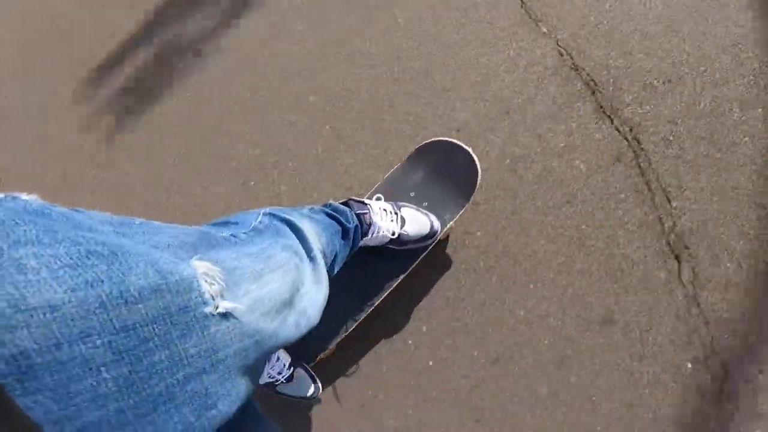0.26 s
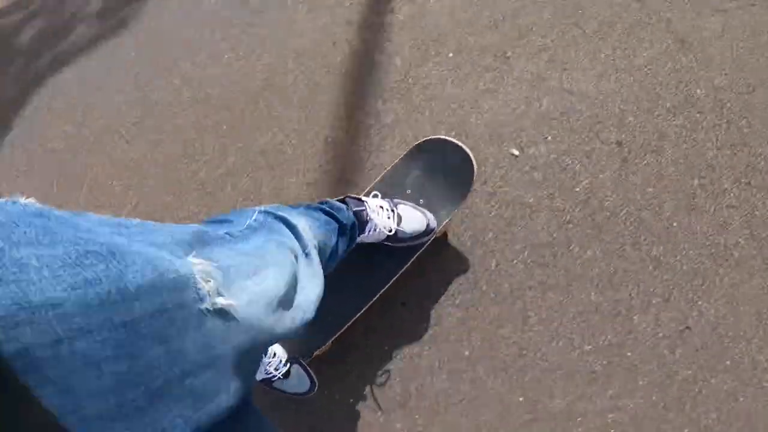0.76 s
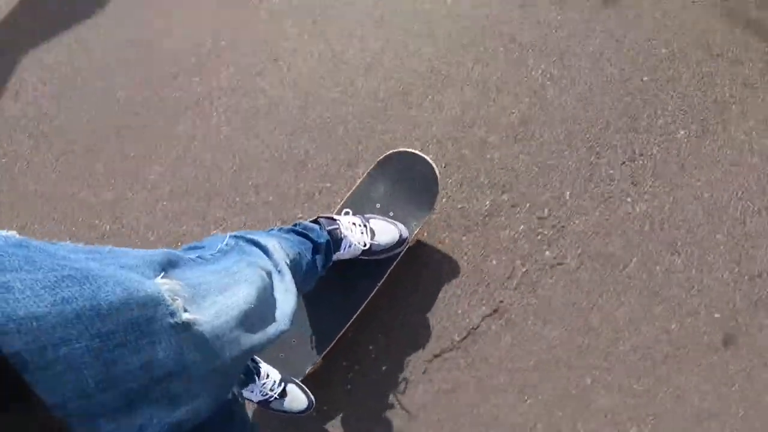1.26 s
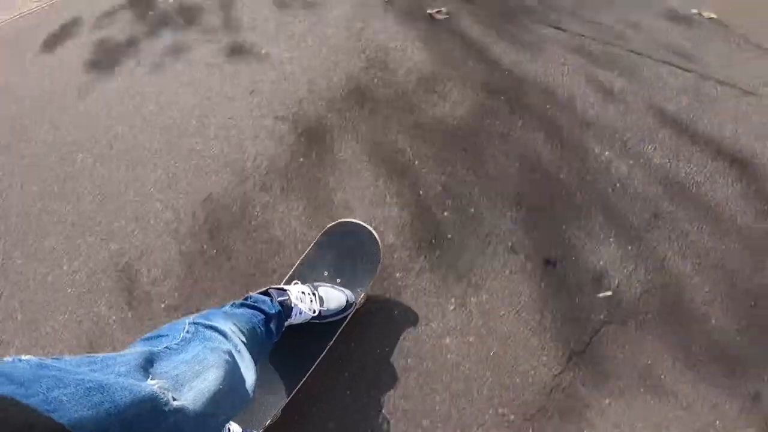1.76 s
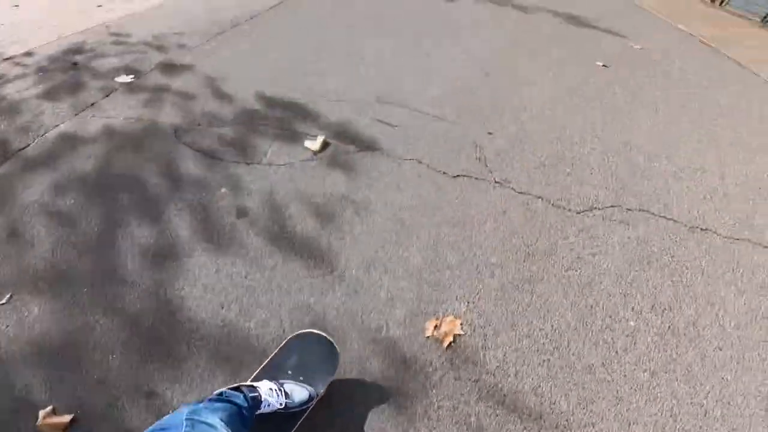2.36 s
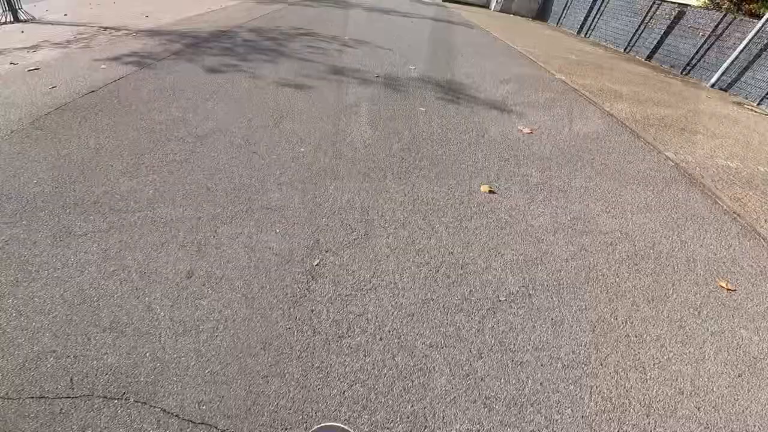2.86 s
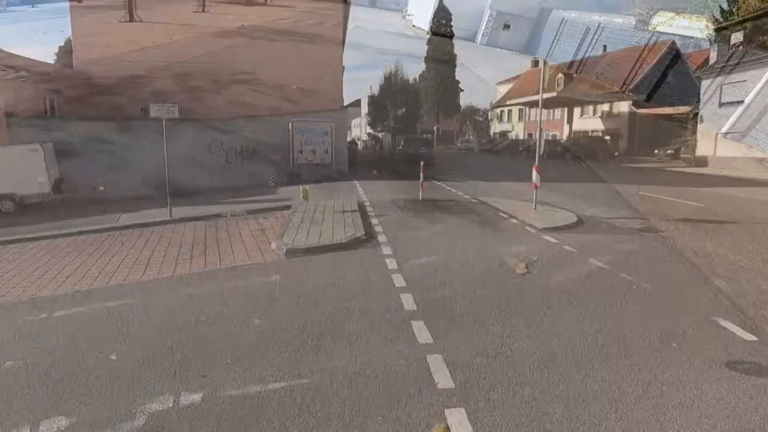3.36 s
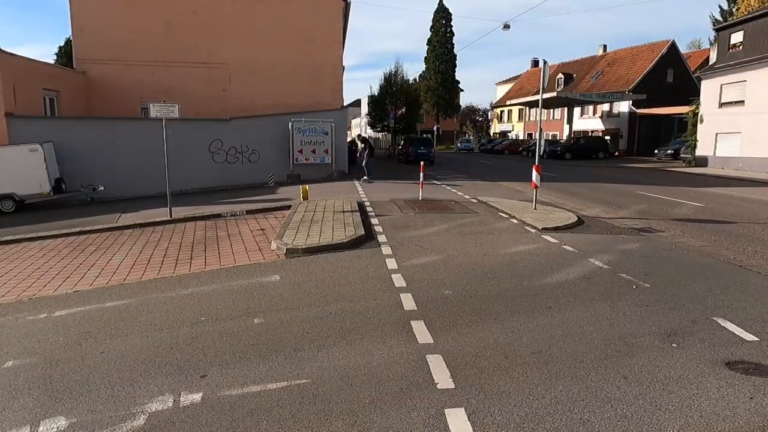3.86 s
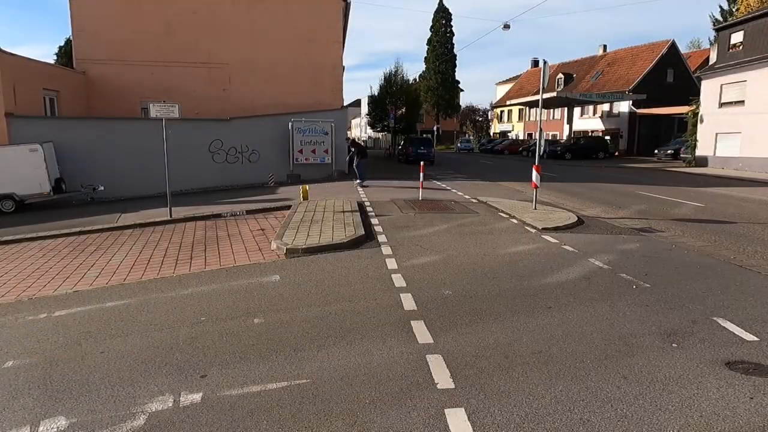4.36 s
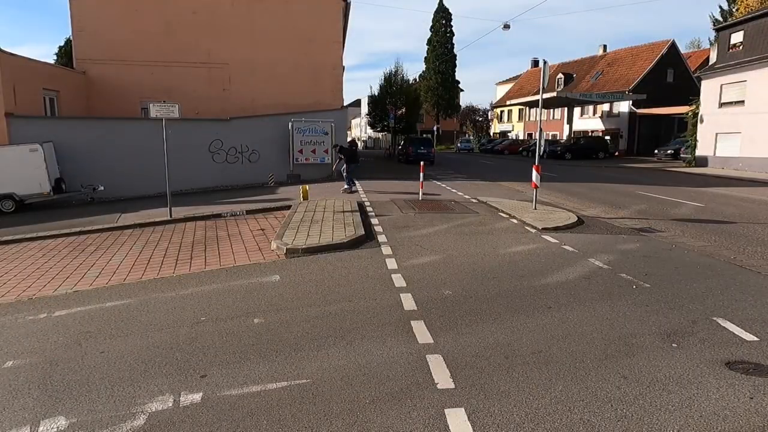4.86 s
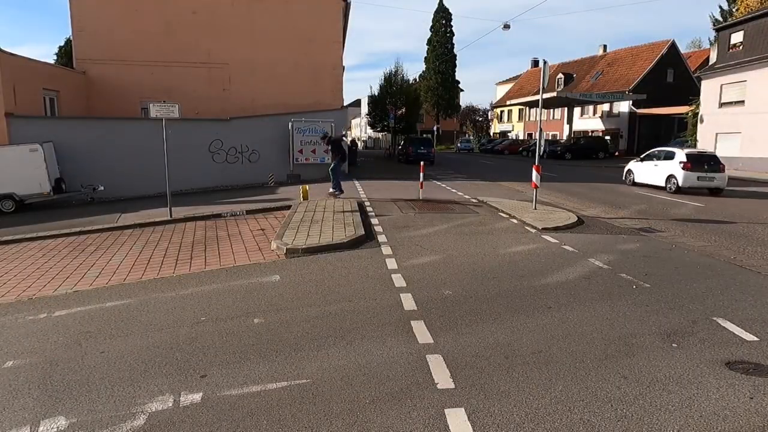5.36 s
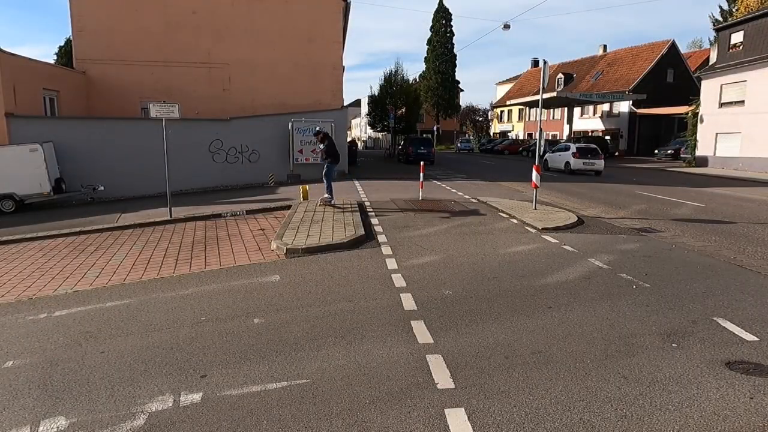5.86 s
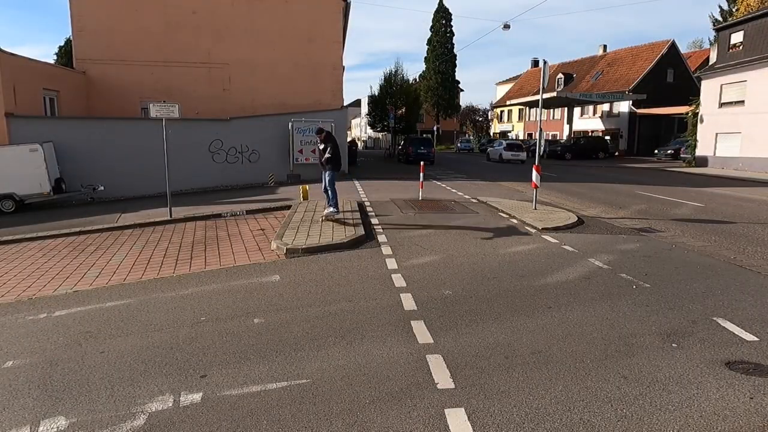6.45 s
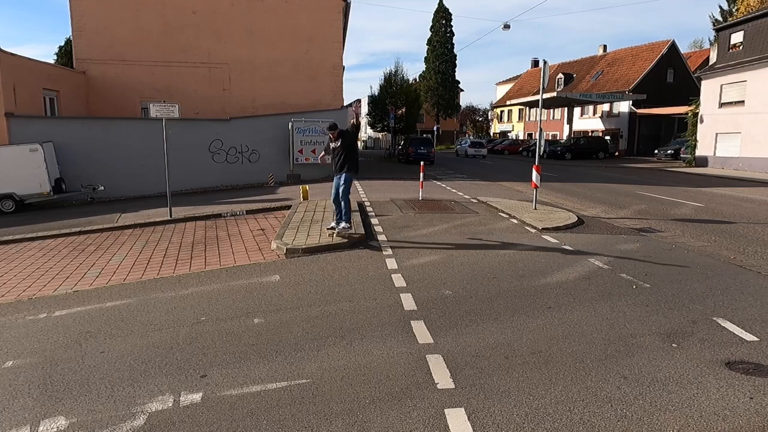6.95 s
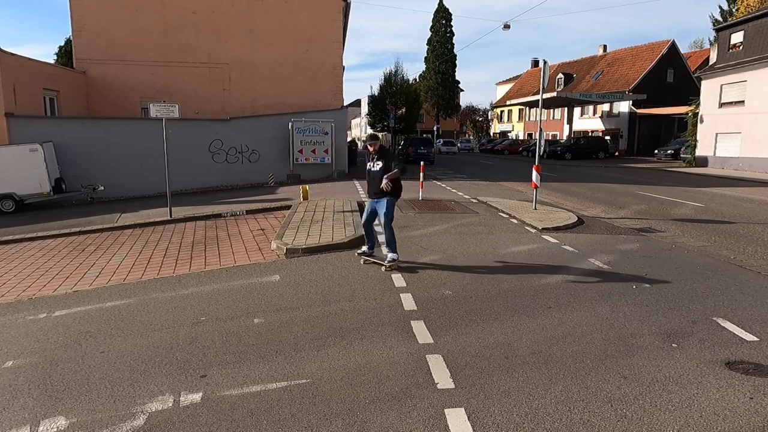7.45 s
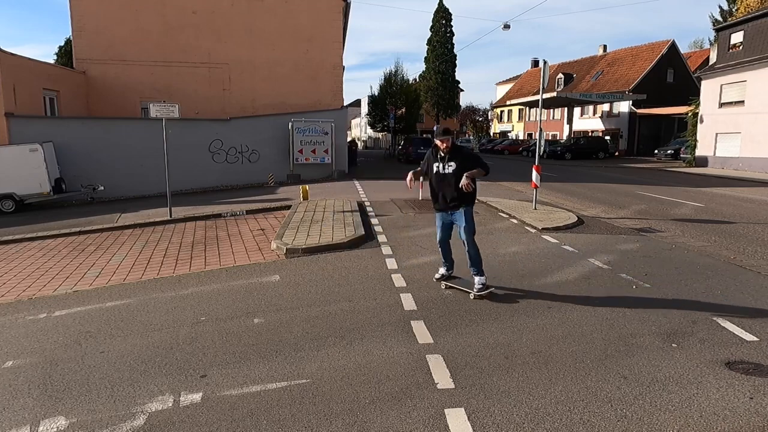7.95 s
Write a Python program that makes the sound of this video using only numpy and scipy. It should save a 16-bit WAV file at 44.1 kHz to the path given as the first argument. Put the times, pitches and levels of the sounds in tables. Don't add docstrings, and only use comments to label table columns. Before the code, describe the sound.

From 0 to about 2.7 s a skateboard rolls very close to the microphone over rough asphalt: a hollow deck drone, rattling trucks, hissing grit, irregular stone ticks, jiggling bolts and sizzling bearings, with low wind buffeting. A crack thumps the deck near 0.6 s and again at 2.4 s. Between 2.7 and 3.8 s this fades while street traffic rises. From 3.8 to 6 s a car passes, with a low exhaust hum near 60 Hz, pulling hardest around 5 s, and smooth tyre hiss. At 5.57 s a distant board pops with a sharp woody crack, lands softly at 5.73 s, then trundles over pavers with rapid uneven jolts until 7.2 s. At 7.36 s it drops with a hard, blunt clack, short wall echoes and settling rattle. Faint bearing squeals and quieter rolling follow, swelling at the end with a short scuff near 8.14 s.

```python
import sys
import numpy as np
from scipy import signal
from scipy.fft import rfft, irfft
from scipy.io import wavfile
from scipy.ndimage import uniform_filter1d

SR = 44100
rng = np.random.default_rng(int(sys.argv[2]) if len(sys.argv) > 2 else 0)


def gain_from_db(level_db):
    decades = np.asarray(level_db, float) / 20
    return 10 ** decades


def unload_wav(signal):
    wavfile.write(
        sys.argv[1],
        SR,
        np.round(np.clip(np.atleast_2d(signal).T, -1, 1) * 32767).astype(np.int16),
    )


N = 361619
TIME_S = np.arange(N) / SR


def rms_one(x):
    return x / np.sqrt(np.mean(x ** 2) + 1e-20)


def in_time(rows):
    s, *columns = np.transpose(rows)
    s = np.r_[s[0] - 0.05, s, s[-1] + 0.05]
    return [np.interp(TIME_S, s, np.r_[-120, column, -120]) for column in columns]


def swell(centre_s, half_s):
    return np.exp(-((TIME_S - centre_s) / half_s) ** 2)


def drift(rate):
    r = np.exp(-80 * np.pi * rate / SR)
    noise = rng.standard_normal(N // 40 + 2002)
    slow = signal.lfilter([1], [1, -2 * r, r * r], noise)[2000:]
    return np.interp(np.arange(N) / 40, np.arange(len(slow)), rms_one(slow))


def colour(x, spectrum):
    hz, level_db = np.transpose(spectrum)
    grid = np.maximum(np.fft.rfftfreq(8192, 1 / SR), 1)
    log_level = np.interp(np.log(grid), np.log(hz), level_db) * np.log(10) / 20
    cepstrum = irfft(log_level)
    cepstrum[1:4096] *= 2
    cepstrum[4097:] = 0
    response = irfft(np.exp(rfft(cepstrum)))
    return rms_one(signal.oaconvolve(x, response)[:N])


def resonate(x, modes):
    out = 0
    for k, (hz, width, level_db) in enumerate(modes):
        r = np.exp(-np.pi * width / SR)
        a = [1, -2 * r * np.cos(2 * np.pi * hz / SR), r * r]
        out = out + (-1) ** k * gain_from_db(level_db) * signal.lfilter([1 - r, 0, r - 1], a, x)
    return out


def low_pass(hz):
    return signal.butter(2, hz, fs=SR, output="sos")


def band(x, low_hz, high_hz, order=2):
    return signal.sosfilt(signal.butter(order, [low_hz, high_hz], "band", fs=SR, output="sos"), x)


def pressed_body(road, force, modes, low_hz, high_hz):
    steady, driven = band(resonate(np.stack([road, road * force]), modes), low_hz, high_hz, order=3)
    return driven / np.std(steady)


def grains(per_s, spread_db):
    sizes = gain_from_db(spread_db * np.minimum(rng.exponential(1, N), 4)) * rng.choice([-1, 1], N)
    return rms_one(sizes * (rng.random(N) < per_s / SR))


def bursts(times, levels_db, decays_s):
    out = np.zeros(N)
    for s, level_db, decay_s in np.broadcast(times, levels_db, decays_s):
        start = int(s * SR)
        age = np.arange(min(N - start, SR // 5)) / SR
        out[start:start + len(age)] += gain_from_db(level_db) * np.exp(-age / decay_s) * (1 - np.exp(-age / 0.00078))
    return out


def strike(contacts, modes, push_s):
    s, grind_db, grind_s, thud_db = np.transpose(contacts)
    grinding = grains(15000, 0.6) * bursts(s, grind_db, grind_s)
    push = grinding + bursts(s, thud_db + 1.0, push_s) + 1e-18
    return gain_from_db(17.5) * signal.sosfilt(low_pass(7000), resonate(push, modes))


# time in seconds, level in dB.
GUSTS = [(0, 5), (.45, 2), (1.0, 0), (1.7, -3.5), (1.9, 6), (2.1, -7), (2.4, -5), (2.7, 1), (3.3, 2.5),
         (8.2, -2)]


def wind():
    gust_db, = in_time(GUSTS)
    return gain_from_db(-48.5 + gust_db + 0.83 * drift(2.2)) * rms_one(band(rng.standard_normal(N), 25, 79))


# time in seconds, level in dB.
NEARNESS = [(0, -9), (3.7, -5.5), (3.85, -3), (4.0, -1.5), (4.5, 1.3), (5.0, 2), (5.7, 0.5), (6.5, -0.64),
            (7.3, -0.5), (7.7, -3.5), (8.2, -3.5)]
# frequency in Hz, level in dB per Hz.
RUMBLE = [(12, -33.5), (20, -8.5), (43, 1.5), (65, 2), (132, -10.5), (173, -4.5), (398, -16), (462, -13),
          (700, -21.5), (910, -67), (1540, -120)]
ROAR = [(240, -29), (400, -3.5), (570, 3), (641, -7.5), (698, 0), (1190, -1.5), (3000, -17), (3900, -63.5),
        (6600, -120)]
HISS = [(1180, -19.5), (2000, -1), (2270, -13.5), (2540, -7.5), (3310, -5), (6460, -20.5), (8430, -21),
        (11200, -27.5), (12700, -34), (15500, -40)]
# centre in seconds, level in dB, half length in seconds.
TREAD_SONGS = [(4.353, -42, 0.13), (4.594, -42, .1), (4.85, -40, 0.15), (5.094, -41.5, 0.16),
               (5.24, -40, 0.14), (6.5, -51, 0.086), (7.203, -45.5, 1), (8.2, -48, 0.23)]
# frequency in Hz, width in Hz, level in dB.
TREAD = [(1100, 160, 4), (1250, 130, 6), (1645, 300, -5.5)]


def traffic():
    near_db, = in_time(NEARNESS)
    noise = rng.standard_normal((4, N))
    rumble = gain_from_db(-33.5 + 0.6 * near_db + 0.9 * drift(3.6)) * colour(noise[0], RUMBLE)
    roar = gain_from_db(-37 + near_db + 0.29 * drift(26)) * colour(noise[1], ROAR)
    hiss = gain_from_db(-48.5 + 1.16 * near_db + 1.6 * drift(4.0)) * colour(noise[2], HISS)
    air = hiss - signal.sosfiltfilt(low_pass(8000), hiss)
    hiss = hiss + (gain_from_db(-12 + 0.84 * near_db + 0.8 * drift(6)) - 1) * air
    song = sum(gain_from_db(level_db) * swell(s, half_s) for s, level_db, half_s in TREAD_SONGS)
    tread = pressed_body(noise[3], song * gain_from_db(1.5 * drift(23)), TREAD, 880, 1970)
    fade_in = np.interp(TIME_S, (2.45, 3.63), [0, 1])
    return fade_in * (rumble + roar + hiss + tread)


# time in seconds, firing rate in Hz, firing level in dB, second order in dB.
ENGINE = [(3.3, 57.48, -38, -45.5), (3.6, 57.63, -59, -40.5), (3.83, 60.45, -31.5, -34.5),
          (4.04, 59.5, -29, -40), (4.31, 59.63, -30, -27), (4.81, 59.22, -26, -38),
          (5.15, 60.86, -28.5, -33), (5.72, 61.2, -27, -29), (5.85, 61.35, -30.5, -55),
          (6.25, 60.54, -35, -48.5), (6.5, 63.45, -57, -37), (7.2, 62.36, -34, -37), (7.5, 61.06, -40, -47),
          (7.87, 66.4, -30.5, -48), (8.2, 61.2, -36.5, -55)]


def car():
    firing_hz, first_db, second_db = in_time(ENGINE)
    turn = 2 * np.pi * np.cumsum(np.maximum(firing_hz, 50)) / SR
    first = gain_from_db(first_db + 0.93 * drift(9.5)) * np.cos(turn + 0.13 * drift(5.7))
    second = gain_from_db(second_db + 2.5 * drift(7.4)) * np.cos(2 * turn + 0.38 * drift(6.1))
    pull_db = 12 * swell(5.06, 0.5)
    fifth = gain_from_db(first_db - 26 + pull_db + 2 * drift(4)) * np.cos(5 * turn + 1.6 * drift(12))
    return np.sqrt(2) * (first + second + fifth)


# frequency in Hz, width in Hz, level in dB.
THRUM = [(108.4, 22, 7), (134, 17, 7.5), (195, 22, -1), (259, 40, -3)]
WHEEL = [(550, 50, 1), (744, 67, 2.5), (1407, 110, -5), (2120, 140, -12)]
BEARING = [(6660, 410, 5), (7700, 900, -4.5), (9700, 380, -10.5), (12600, 2000, -13.5)]
# time in seconds, peak in dB, jolt of the deck in dB.
JOINTS = [(5.732, -17, -42), (5.798, -32, -45), (5.919, -28, -32), (6.006, -29, -40), (6.073, -26, -41),
          (6.107, -32, -23), (6.155, -28, -21), (6.247, -27, -27), (6.298, -20, -16), (6.353, -22, -23),
          (6.422, -34, -18.5), (6.458, -25, -23), (6.492, -30, -25), (6.523, -17.5, -22), (6.554, -24, -26),
          (6.579, -23, -24), (6.61, -32, -28), (6.638, -34, -31), (6.713, -26, -26), (6.776, -26, -33),
          (6.821, -31, -32), (6.85, -26, -23), (6.884, -25, -18), (6.91, -35, -25), (6.946, -32, -29),
          (6.979, -24, -15.5), (7.021, -25, -15.5), (7.091, -37, -31), (7.131, -19.5, -23),
          (7.19, -15, -25), (7.224, -28, -31)]


def far_rolling():
    on_s, off_s, ease_s = 5.74, 7.26, 0.081
    landed = np.interp(TIME_S, [on_s - ease_s, on_s], [0, 1])
    paved = np.interp(TIME_S, [off_s, off_s + ease_s], [1, 0])
    near_db = off_s - TIME_S
    thrum_db = paved * -34 + (1 - paved) * -40 + near_db
    wheel_db = paved * -42.5 + (1 - paved) * -45 + near_db
    bearing_db = paved * -73 + (1 - paved) * -72 + near_db
    rush_db = 12 * np.exp((TIME_S - TIME_S[-1]) / 0.11)
    s, peak_db, _ = np.transpose(JOINTS)
    road = grains(6000, 1.1)
    thrum = pressed_body(road, landed * gain_from_db(thrum_db + 3.0 * drift(2.5)), THRUM, 79, 254)
    wheel_force = landed * gain_from_db(wheel_db + rush_db) + bursts(s, peak_db - 10.5, 0.0081)
    wheel = pressed_body(road, wheel_force, WHEEL, 380, 2300)
    sizzle = landed * gain_from_db(bearing_db + rush_db + 2.6 * drift(25)) + bursts(s, peak_db - 39, 0.015)
    bearing = rms_one(band(resonate(grains(12000, 2.0), BEARING), 5000, 13500)) * sizzle
    return thrum + wheel + bearing


# start in seconds, level in dB, decay in seconds.
SCUFF = [
    (8.04, -59, .03),
    (8.125, -47, 0.0088),
    (8.138, -38.5, 0.017),
    (8.16, -46, 0.02),
    (8.18, -48, 0.017),
]
# frequency in Hz, level in dB per Hz.
SCUFF_TONE = [(1470, -48), (2500, -1), (2700, -3), (3370, -7), (3660, -2.5), (4070, -16), (4750, -14),
              (5360, -17), (6740, -15), (8870, -30.5), (15500, -41)]


def scuff():
    scrapes = uniform_filter1d(bursts(*np.transpose(SCUFF)), size=500)
    return scrapes * colour(grains(4000, 2.3), SCUFF_TONE)


# centre in seconds, half length in seconds, frequency in Hz, level in dB.
SQUEALS = [
    (7.27, .07, 9400, -76),
    (7.5, .08, 7400, -71),
    (7.53, .07, 6900, -72),
    (7.1, .1, 9000, -79),
]


def squeals():
    road, out = grains(6000, 1.1), 0
    for s, half_s, hz, level_db in SQUEALS:
        mode = [(hz, 130, 0)]
        out = out + swell(s, half_s) * gain_from_db(level_db) * rms_one(resonate(resonate(road, mode), mode))
    return out


# time in seconds, grinding in dB, grinding time in seconds, thud in dB.
POP = [(5.5645, -34, 0.0018, -7), (5.5672, -18.5, 0.002, 11), (5.5742, -21, 0.0036, 14),
       (5.5785, -20, 0.003, 0), (5.585, -31, 0.0049, -5), (5.608, -24, 0.0024, 1),
       (5.6105, -38, 0.0027, -1), (5.62, -28, 0.004, -4), (5.648, -31, 0.0055, -10), (5.74, -29, 0.004, -1)]
LAND = [(5.7315, -24, 0.0035, -17), (5.7395, -23, 0.005, -20), (5.748, -33, 0.0046, -25),
        (5.7585, -32, 0.0037, -25), (5.7635, -25.5, 0.006, -14.5), (5.7805, -34, 0.005, -15),
        (5.7925, -30, .004, -24), (5.7985, -29, 0.0054, -18), (5.8125, -30, 0.006, -18),
        (5.84, -33, .008, -22), (5.853, -36, 0.0058, -20), (5.873, -32, 0.0054, -18),
        (5.92, -38, 0.0065, -24), (6.006, -37, 0.005, -18.5), (6.071, -35, 0.0066, -29)]
DROP = [
    (7.352, -32, 0.006, -45),
    (7.3595, -10.5, 0.0036, -24),
    (7.3635, -10.5, 0.002, -9),
    (7.3705, -20, .003, -23),
    (7.3732, -11, 0.0027, -15),
    (7.3765, -32, 0.002, -13.5),
    (7.388, -30, 0.0041, -31),
]
SETTLE = [(7.402, -39, 0.0044, -25), (7.417, -40, .007, -21.5), (7.433, -28, .005, -27),
          (7.447, -25, .004, -26), (7.459, -30, .006, -30), (7.468, -35, .006, -34),
          (7.485, -33, .005, -33), (7.494, -37, 0.0068, -34), (7.515, -39, 0.0071, -34),
          (7.545, -39, .01, -29)]
# frequency in Hz, width in Hz, level in dB.
TAIL_WOOD = [(524, 95, -9), (1177, 38, 0), (1480, 71, -4), (1610, 80, -3), (1866, 41, 8.5), (2490, 65, -1),
             (2860, 180, -15), (3230, 90, -10), (3760, 100, -9.5), (4520, 120, -14), (5150, 400, -25),
             (6300, 500, -27), (7150, 370, -22.5)]
AXLES = [(110, 72, -4), (179, 37, 2.5), (234, 31, 0.5), (593, 74, 7.5), (690, 152, 0.5), (1060, 140, -7),
         (1340, 130, -8), (1590, 115, -10.5), (1910, 57, 0.5), (2620, 290, -17), (3360, 200, -17.5),
         (4540, 480, -24.5), (7000, 2900, -34), (12500, 1400, -49)]
LOADED_DECK = [(111, 46, -1.5), (170, 100, -7.5), (253, 62, 1), (390, 110, -6), (512, 148, 1.5),
               (774, 100, 1), (1210, 460, -13.5), (1820, 290, -5.5), (2550, 350, -22.5), (4000, 640, -22),
               (7000, 2200, -32)]
# delay in seconds, level in dB.
WALLS = [(.045, -28), (.062, -19), (0.078, -12), (0.087, -13.5), (0.106, -21), (.125, -28), (.145, -31),
         (.18, -27)]


def clacks():
    jolts = [(s, peak_db - 24, 0.0048, jolt_db) for s, peak_db, jolt_db in JOINTS]
    pop = strike(POP, TAIL_WOOD, push_s=0.0001)
    drop = strike(DROP, AXLES, push_s=0.00082)
    drop += strike(LAND + SETTLE, LOADED_DECK, push_s=0.00082)
    drop += strike(jolts, THRUM + WHEEL, push_s=0.0008)
    delay_s, level_db = np.transpose(WALLS)
    walls = bursts(delay_s, level_db, 0.0037)[:SR // 2] * rng.standard_normal(SR // 2)
    outward = band(gain_from_db(-8) * pop + drop, 300, 2000, order=1)
    return pop + drop + signal.oaconvolve(outward, gain_from_db(-23.0) * walls)[:N]


# time in seconds, peak in dB.
STONES = [(0.093, -37), (0.184, -37), (0.2356, -42.5), (0.2982, -45), (0.3775, -31.5), (0.4648, -30),
          (0.6586, -31.5), (0.689, -35.5), (0.811, -37.5), (1.001, -38), (1.052, -53), (1.2024, -36.5),
          (1.315, -36.5), (1.5195, -35), (1.561, -37), (1.7905, -26.5), (1.9696, -33), (2.012, -31),
          (2.0763, -31), (2.246, -31), (2.2806, -27.5), (2.3257, -31), (2.401, -33.5), (2.4953, -31),
          (2.6504, -36), (2.7367, -41), (2.897, -37), (3.2526, -36.5), (3.4391, -31.5), (3.582, -32.5),
          (3.592, -36.5)]
CHIPS = [(0.0288, -34), (0.1121, -25), (0.322, -33), (0.3461, -32.5), (0.428, -24), (0.5791, -36),
         (0.601, -23), (0.6225, -23), (0.7292, -34.5), (0.7537, -34), (0.8455, -28), (0.9477, -36.5),
         (1.0291, -25), (1.2494, -43), (1.2725, -38.5), (1.3553, -20.5), (1.3818, -29), (1.4264, -37.5),
         (1.477, -24.5), (1.5479, -22), (1.5833, -29), (1.6077, -33.5), (1.6591, -30.5), (1.7489, -23.5),
         (1.807, -26), (1.8417, -36.5), (1.8821, -37.5), (1.9285, -31.5), (2.0577, -24), (2.1301, -26.5),
         (2.1605, -36.5), (2.2004, -30.5), (2.2189, -27.5), (2.3466, -34.5), (2.3645, -21.5),
         (2.5531, -34.5), (2.5825, -26), (2.6064, -29), (2.6913, -40), (2.8064, -46), (2.8863, -30),
         (3.033, -34.5), (3.1118, -40), (3.1574, -29.5), (3.2094, -42), (3.2794, -35), (3.46, -33.5),
         (3.5544, -36), (3.6024, -31)]


def stone_hits(coarse_db, fade, end_s):
    chance = rng.random((120, 2))
    pebble_s = np.cumsum(-np.log(chance[:, 0])) / 18
    pebble_db = -47 - 6.5 * np.log(np.maximum(chance[:, 1], 0.15))
    pebble_db += coarse_db[np.minimum(pebble_s * SR, N - 1).astype(int)]
    s, peak_db = np.transpose(STONES + [(s, level_db - 12) for s, level_db in CHIPS])
    peak_db = peak_db + 3.5 - 20 * np.log10(fade[(s * SR).astype(int)])
    return np.minimum(np.r_[s, pebble_s], end_s), np.r_[peak_db, pebble_db]


# frequency in Hz, width in Hz, level in dB.
DECK = [(205.4, 60.5, 0.5), (335.6, 74.4, 3), (397, 106.4, 2.5), (730.6, 137, -4)]
MID_DECK = [(497, 160, 2), (590, 104, 0)]
# time in seconds, level in dB, decay in seconds.
CRACKS = [(0.588, -11, 0.0095), (.946, -19, 0.0046), (1.426, -24, 0.0032), (2.361, -27, 0.0045),
          (2.402, -15, 0.015), (2.606, -19, 0.0045), (2.807, -28, 0.0056), (3.156, -24, 0.0036),
          (3.439, -24, 0.0042), (2.966, -16, 0.0056), (3.553, -24, .005), (3.578, -17, 0.0087),
          (3.6, -16, .008)]


def deck_drone(roll_db, weight_db, s, peak_db):
    road = grains(8000, 0.21) * gain_from_db(0.95 * drift(28))
    knock_db = -53 + 0.18 * (peak_db - peak_db.mean())
    force = gain_from_db(-18 + roll_db + 0.35 * drift(5.3))
    force = force + bursts(s, knock_db, 0.0021) + bursts(*np.transpose(CRACKS))
    mid_force = gain_from_db(-26.5 + weight_db + 2.2 * drift(2.5))
    return pressed_body(road, force, DECK, 148, 965) + pressed_body(road, mid_force, MID_DECK, 382, 766)


# frequency in Hz, level in dB per Hz.
TRUCK = [(470, -41), (800, -6), (889, -2), (1610, -10), (1800, -16), (2030, -36), (2300, -26),
         (2990, -49.5), (5060, -120)]
TICK = [(1500, -29.5), (2300, 6), (3500, 1.5), (5500, -8), (7500, -11.5), (8800, -21), (10500, -31),
        (12500, -34), (15500, -59)]
# time in seconds, peak in dB.
SNAPS = [(0.2397, -36), (0.2982, -45), (0.5594, -41), (0.8116, -37), (1.0291, -39), (1.2064, -36),
         (1.2494, -48), (1.2794, -50), (1.5623, -39), (1.6062, -41), (1.6591, -43.5), (1.7898, -43),
         (1.8694, -46), (2.1291, -39), (2.403, -36), (2.4997, -39.5), (2.65, -46), (2.7048, -46.5),
         (2.9003, -49), (3.117, -40)]


def truck_and_ticks(truck_db, s, peak_db):
    truck = (gain_from_db(truck_db) + bursts(s, peak_db, 0.0072)) * colour(grains(6000, 1.4), TRUCK)
    tick_level = uniform_filter1d(bursts(s, peak_db - 11.5, 0.0052), size=220)
    ticks = tick_level * colour(grains(8200, 1.6), TICK)
    snap_s, snap_db = np.transpose(SNAPS)
    crackle = rms_one(band(grains(12000, 1.5), 3300, 8000, order=4))
    return truck + ticks + bursts(snap_s, snap_db - 4, 0.0016) * crackle


# frequency in Hz, width in Hz, level in dB.
HARDWARE = [(2590, 90, 0.5), (3000, 81, 3), (3506, 80, 1.5), (3870, 150, -3), (5230, 130, -6.5),
            (4450, 120, -8)]
AXLE_RING = [(2460, 90, 2), (2285, 98, -1)]


def loose_hardware(hiss_db, coarse, s, peak_db):
    shake = gain_from_db(hiss_db - 4.5 + 1.5 * coarse + 2.2 * drift(30)) + bursts(s, peak_db - 23.5, 0.012)
    jiggle = grains(7000, 6.1)
    slack = np.interp(TIME_S, (0.45, 0.8), [0.15, 1])
    bolts = gain_from_db(-4.5) * pressed_body(jiggle, shake, HARDWARE, 2000, 6000)
    for mode, share in zip(AXLE_RING, (1.1 - slack, slack)):
        bolts += pressed_body(jiggle, shake * share * gain_from_db(-1.5 + mode[2]), [mode], 2000, 3000)
    return bolts


# frequency in Hz, width in Hz, level in dB.
BALLS = [(6300, 760, 4), (7350, 620, 4), (8100, 720, 1.5)]


def wheel_bearings(coarse_db, sand_db):
    force = gain_from_db(-67 + sand_db + 1.3 * drift(12))
    sizzle = pressed_body(grains(9000, 2.0), force, BALLS, 5200, 8800)
    whistle_db = -95.5 + 0.4 * coarse_db + 1.5 * sand_db + 2.5 * drift(8)
    return sizzle + gain_from_db(whistle_db) * rms_one(band(grains(9000, 2.0), 11900, 12800))


# time in seconds, coarseness in dB,
# rider's weight on the mid deck in dB, rolling force in dB.
ASPHALT = [(0, 2.5, -2.5, 2.5), (.54, 2, 3.5, 0), (.85, 2, 3.5, 0.5), (1.45, -0.5, 0, 0.5),
           (1.8, 2, -11, 0.5), (2.2, 2, -14, 0.5), (2.45, 2, -24, -2.5), (2.78, -7.5, -9, -1.5),
           (3.0, -6.5, -4, -1.5), (3.25, -5.5, -6, 0.5), (3.5, -2.5, -3, 1), (3.65, -12.5, -6, -1),
           (3.8, -7.5, 15, 2.5)]
# centre in seconds, lift in dB, half length in seconds.
SAND = [(0.516, 5.5, 0.086), (0.736, 1.5, 0.061), (1.122, 6.5, 0.022), (2.018, 4.5, 0.036),
        (2.294, 5, 0.041), (2.7, 2, .06), (2.952, 2.5, 0.075), (3.12, 4.5, .05), (3.3, 4.5, 0.062),
        (3.178, 8, .02), (3.452, 5, .03), (3.607, 23, 0.023)]
# frequency in Hz, level in dB per Hz.
GRIT = [(1120, -25.5), (1900, 1.5), (2040, -3), (2450, -4), (2750, -6), (3000, -6), (4260, -16),
        (5120, -14.5), (5740, -20.5), (7670, -27.5), (10900, -34), (12400, -37), (15500, -43.5)]


def ride():
    fade_s = (2.74, 3.82)
    fade = np.interp(TIME_S, fade_s, [1, 0])
    coarse_db, weight_db, roll_db = in_time(ASPHALT)
    sand_db = sum(lift_db * swell(s, half_s) for s, lift_db, half_s in SAND)
    coarse = drift(13)
    s, peak_db = stone_hits(coarse_db, fade, fade_s[1])
    truck_db = -35 + 0.99 * coarse_db + 0.62 * sand_db + 1.6 * coarse
    hiss_db = -51.5 + 1.07 * coarse_db + 0.74 * sand_db
    board = deck_drone(roll_db, weight_db, s, peak_db)
    board += truck_and_ticks(truck_db, s, peak_db)
    board += gain_from_db(hiss_db + 0.71 * coarse) * colour(grains(7000, 2.4), GRIT)
    board += loose_hardware(hiss_db, coarse, s, peak_db)
    board += wheel_bearings(coarse_db, sand_db)
    return fade * board


def scene():
    street = wind() + traffic() + car()
    far_board = far_rolling() + scuff() + squeals() + clacks()
    return (street + far_board + ride())[None, :]


# frequency in Hz, width in Hz, depth in dB.
MIC_NOTCH = [(11150, 1500, -4)]


def band_limit(x):
    return signal.sosfilt(signal.butter(12, 15630, fs=SR, output="sos"), x)


def record(dry):
    return band_limit(dry - resonate(dry, MIC_NOTCH))


dry = scene()
out = record(dry)
unload_wav(out)
```